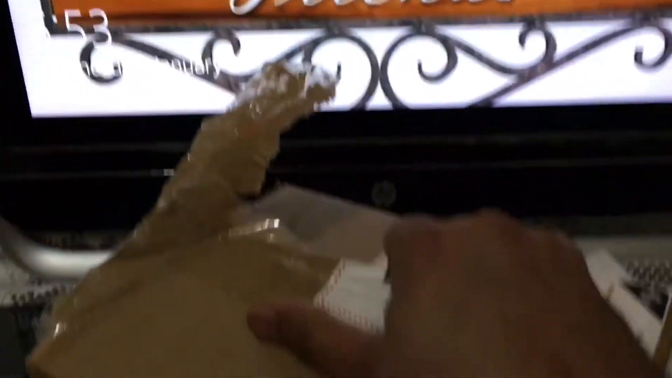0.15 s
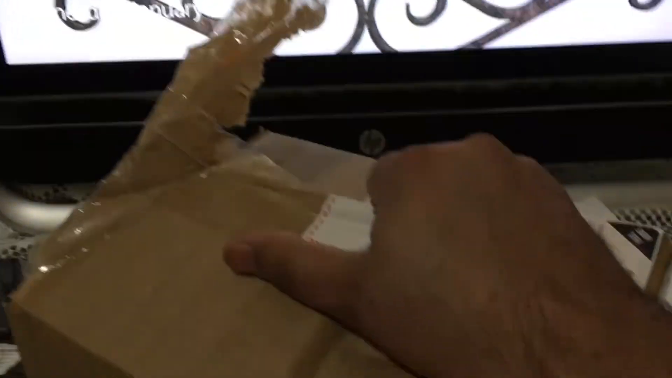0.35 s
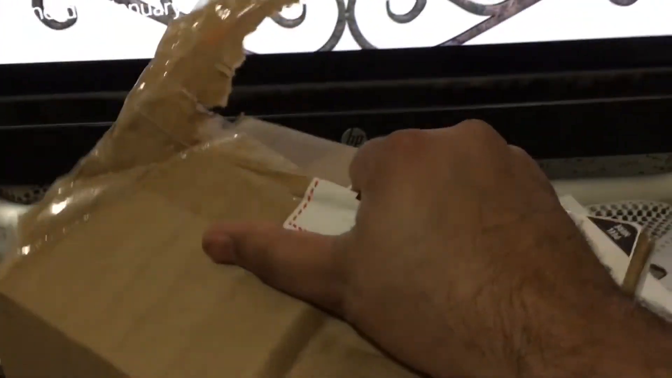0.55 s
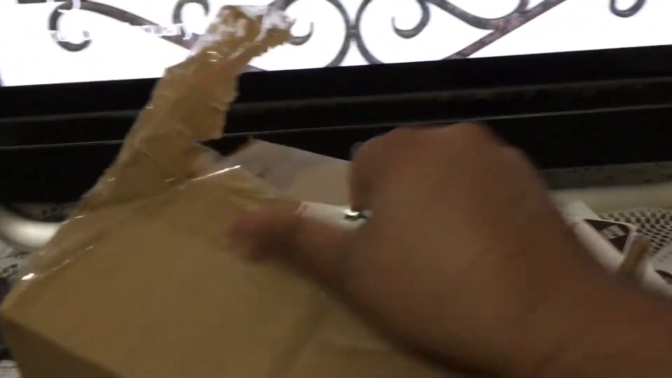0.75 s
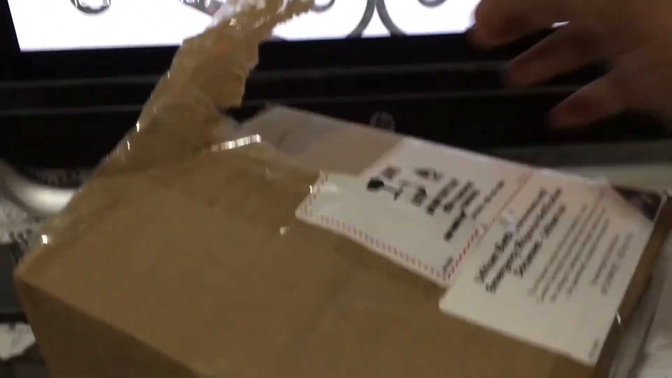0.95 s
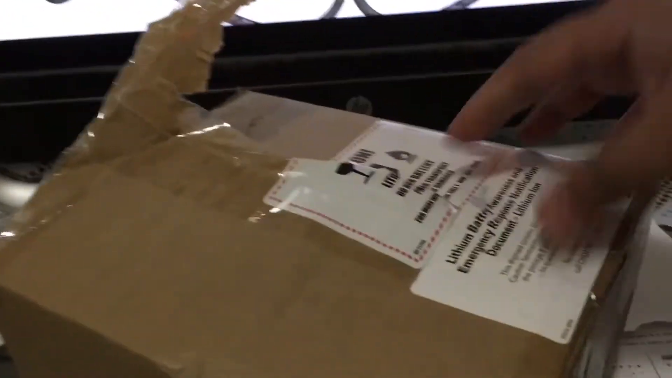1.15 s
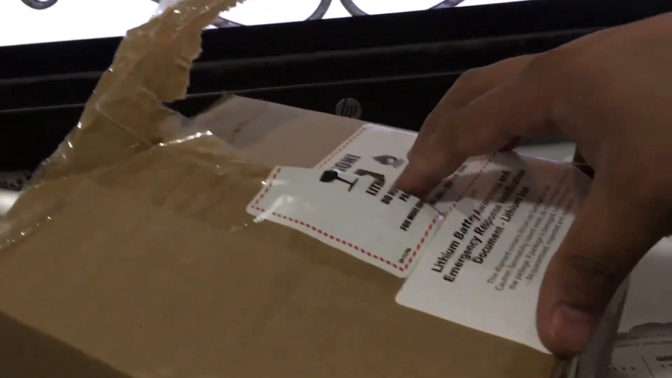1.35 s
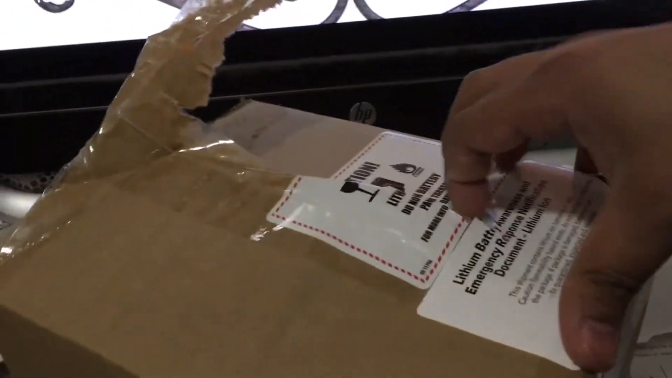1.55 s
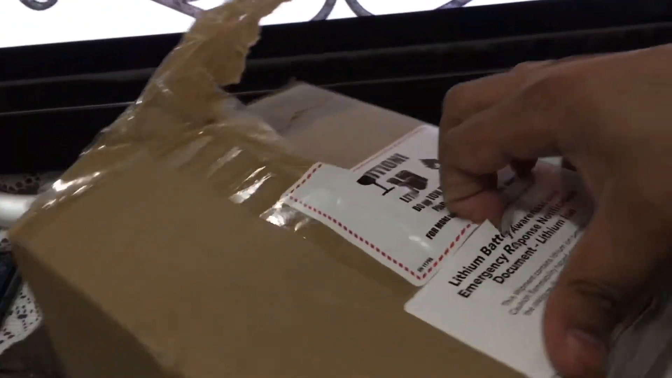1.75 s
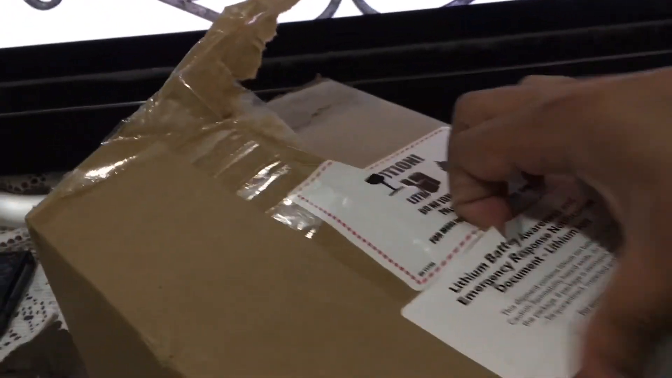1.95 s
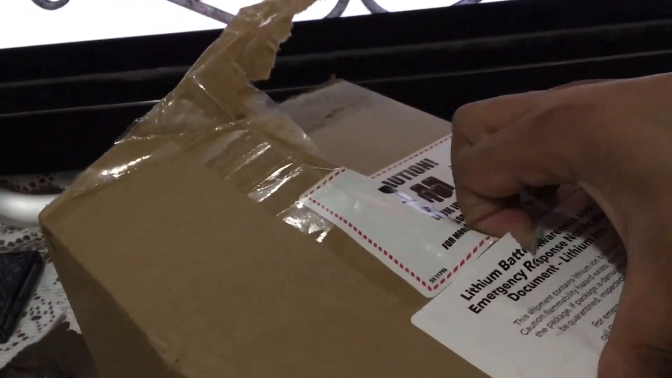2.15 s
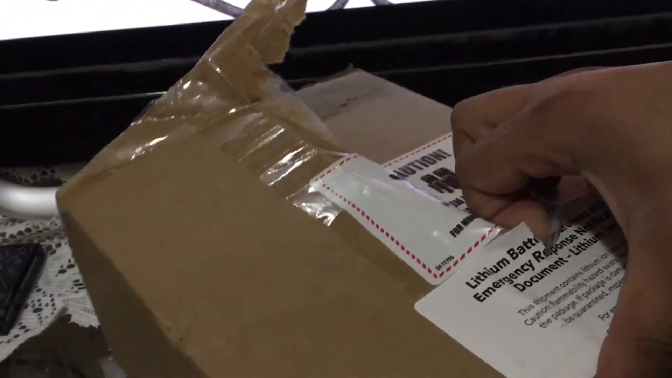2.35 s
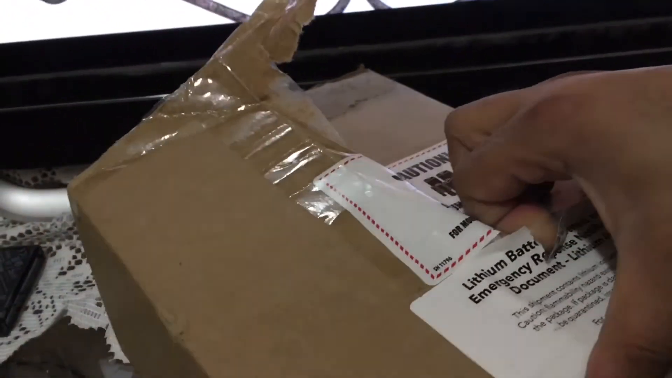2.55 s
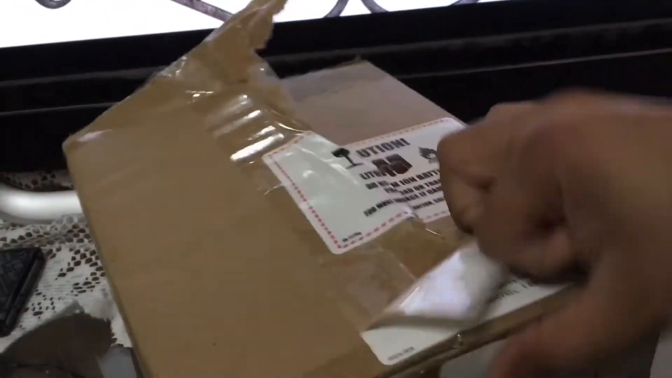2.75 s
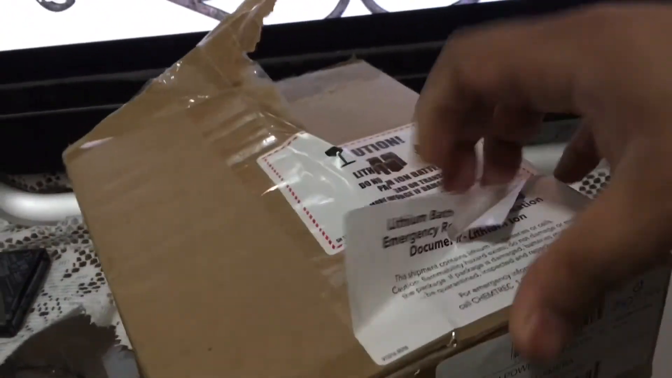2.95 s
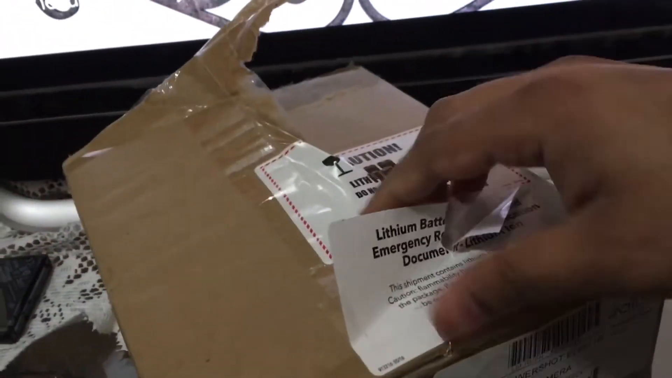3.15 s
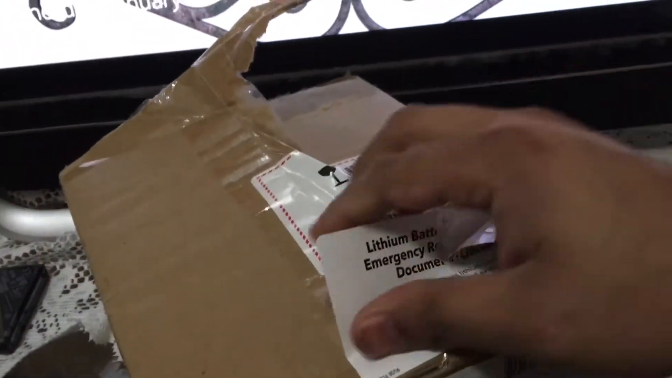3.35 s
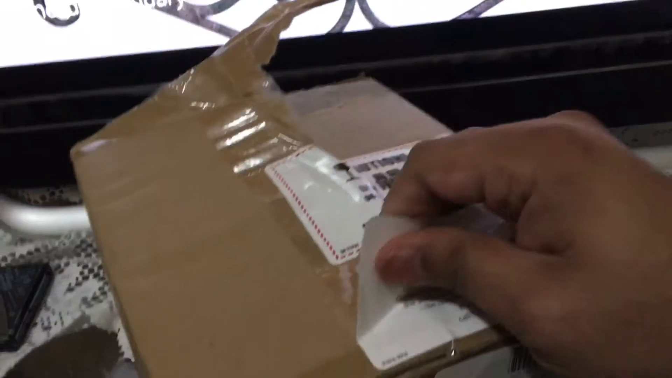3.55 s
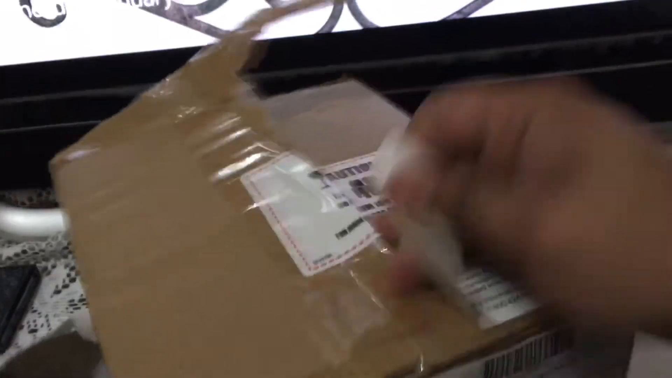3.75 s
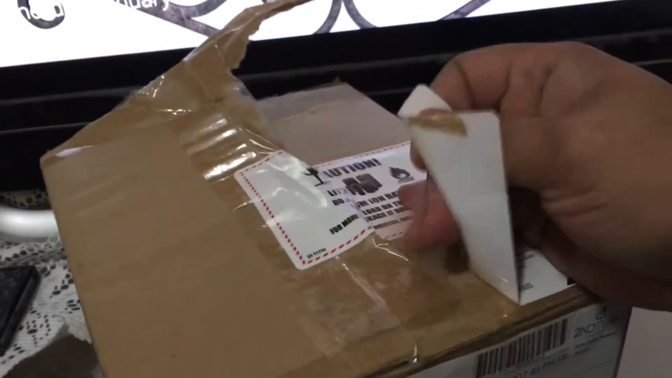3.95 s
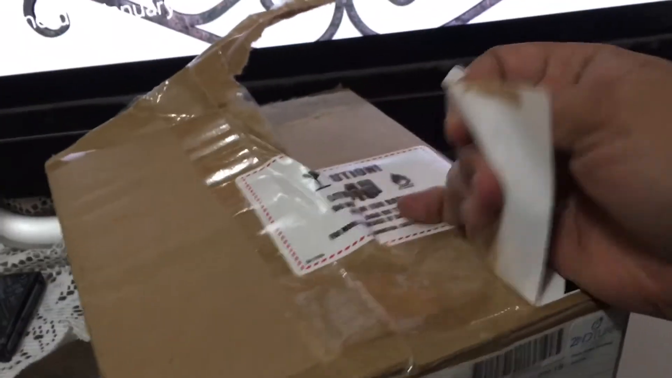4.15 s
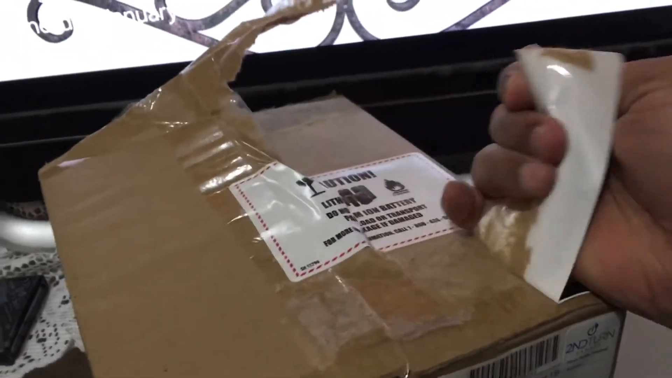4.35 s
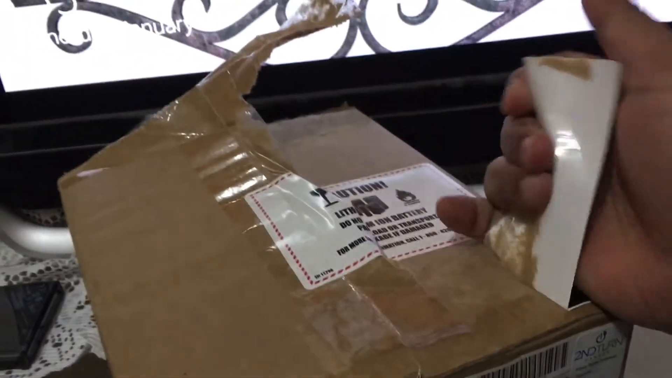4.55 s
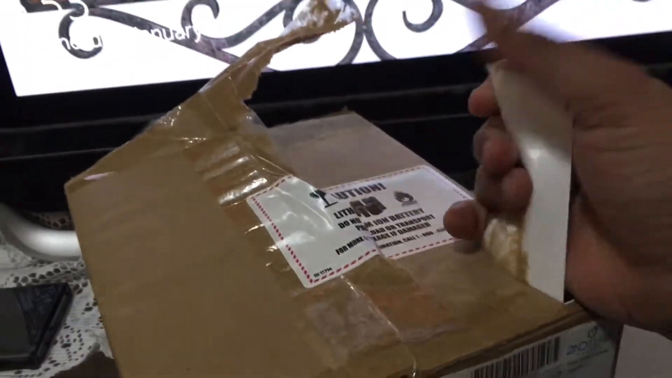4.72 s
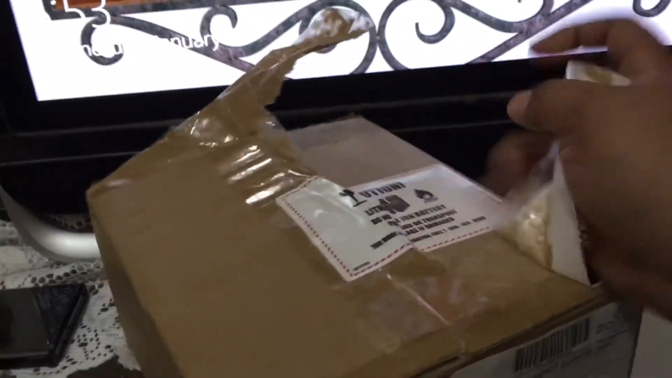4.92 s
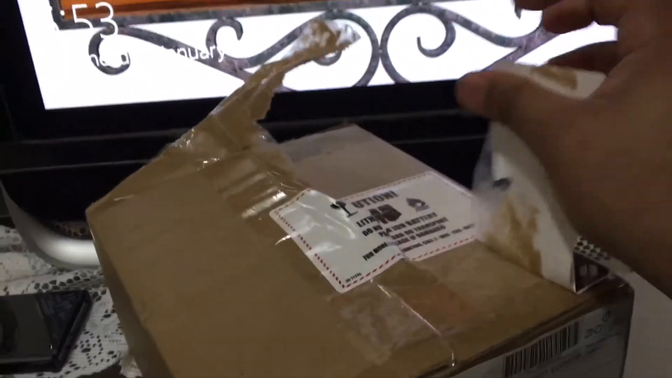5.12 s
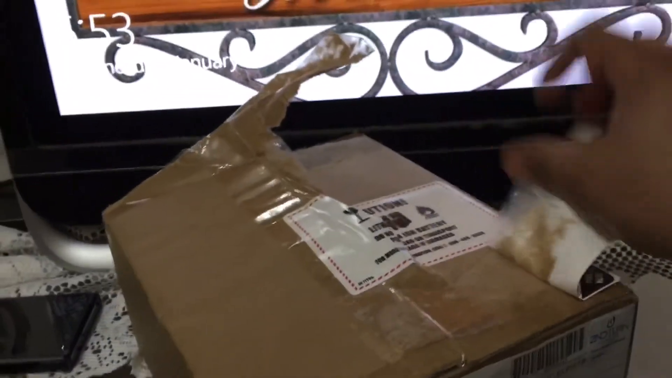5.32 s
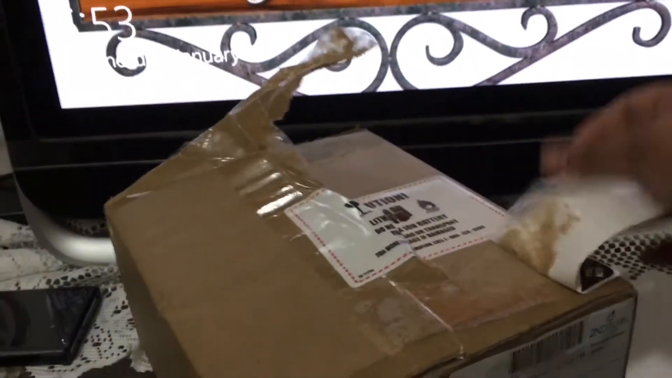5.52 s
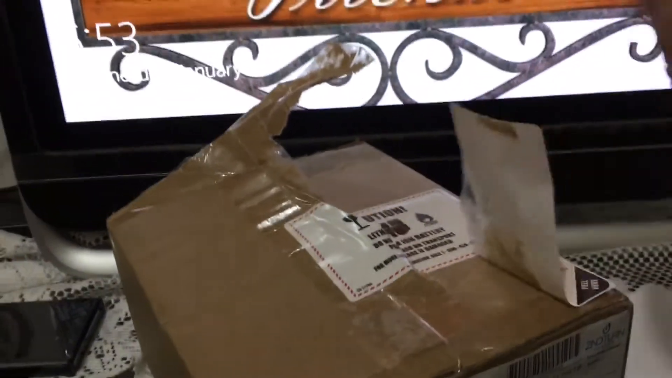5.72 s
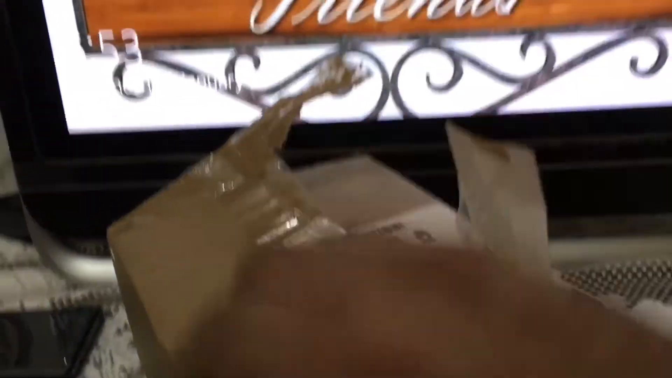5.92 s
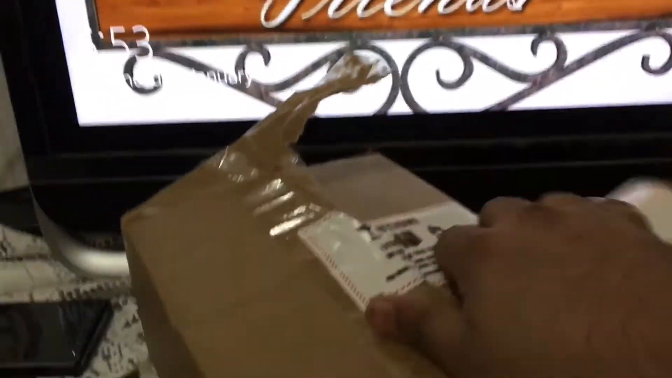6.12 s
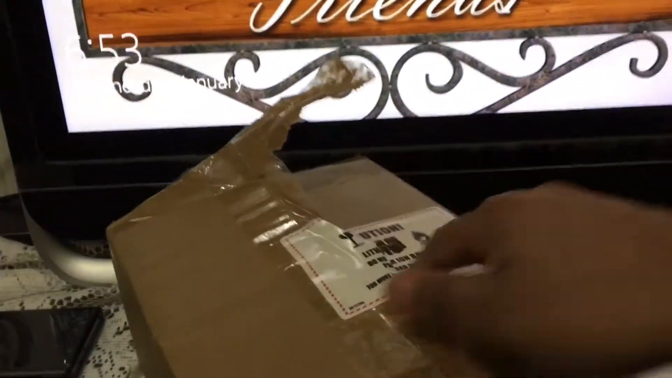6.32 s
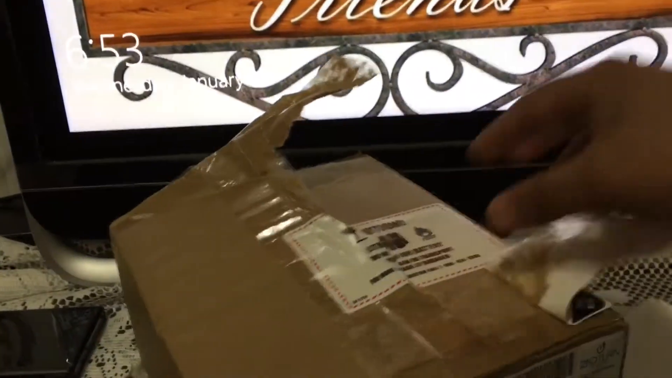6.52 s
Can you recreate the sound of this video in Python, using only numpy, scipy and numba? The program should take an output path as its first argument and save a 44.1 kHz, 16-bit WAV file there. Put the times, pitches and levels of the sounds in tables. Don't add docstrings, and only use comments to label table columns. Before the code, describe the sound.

Close fingers pick and rub at paper on a carton, then rip it loose in loud crackling bursts before settling into faint brushing in a quiet room.

```python
import sys
import numpy as np
from scipy import signal
from scipy.fft import rfft, irfft
from scipy.io import wavfile
from scipy.ndimage import uniform_filter1d
from numba import njit

SR = 44100
rng = np.random.default_rng(int(sys.argv[2]) if len(sys.argv) > 2 else 0)


def materialize(psi):
    bounded = np.clip(np.atleast_2d(psi).T, -1, 1)
    quanta = np.round(bounded * 32767).astype(np.int16)
    wavfile.write(sys.argv[1], SR, quanta)


def volts_from_db(level):
    exponent = np.asarray(level, float) / 20
    return 10 ** exponent


N = 294588


def level(x, db):
    return x * volts_from_db(db) / np.sqrt(np.mean(x ** 2))


def peak(x, db):
    return x * volts_from_db(db) / np.max(np.abs(x))


def band(x, lo_hz, hi_hz, order=2):
    sos = signal.butter(order, [lo_hz, min(hi_hz, 0.48 * SR)], "bandpass", fs=SR, output="sos")
    return signal.sosfilt(sos, x)


def modes(x, table):
    return sum(volts_from_db(db) * band(x, hz - width / 2, hz + width / 2, order=1) for hz, width, db in table)


def colour(points):
    hz, db = np.transpose(points)
    f = np.fft.rfftfreq(N, 1 / SR) + 1
    gain = volts_from_db(np.interp(np.log(f), np.log(hz), db))
    return irfft(rfft(rng.standard_normal(N)) * gain, N)


def walk(rate_hz):
    hold = int(SR / rate_hz)
    steps = np.repeat(rng.standard_normal(N // hold + 1), hold)
    return 1.14 * uniform_filter1d(uniform_filter1d(steps, hold), hold)[:N]


def crumbs(grains_per_s, spread_db, grain_s):
    strength = volts_from_db(spread_db * np.minimum(rng.exponential(size=N), 3))
    ticks = (rng.random(N) < grains_per_s / SR) * strength
    return level(signal.lfilter([1], [1, -np.exp(-1 / (grain_s * SR))], ticks), 0)


def gate(start_s, end_s, edge_s):
    t = np.arange(N) / SR
    return np.clip(np.minimum(t - start_s, end_s - t) / edge_s, 0, 1)


# (frequency [Hz], level [dB per Hz])
ROOM_AIR = [(26, -32.5), (45, 0.5), (197, -3), (321, -7.5), (391, 0), (640, -13.5), (880, -8),
            (1400, -15.5), (2500, -21), (3100, -31), (12500, -39), (16000, -39.5)]
ROOM_DB = -50.5
# (time [s], low line level [dB], upper line level [dB])
MOTOR = [(0, -61.5, -57), (4.0, -58.5, -64.5), (5.1, -69.5, -57), (5.5, -56, -56.5), (5.7, -57, -69),
         (6.68, -52, -75)]
# (low [Hz], upper [Hz])
MOTOR_HZ = (210.6, 384)


def room():
    s, *lines_db = np.transpose(MOTOR)
    t = np.arange(N) / SR
    out = level(colour(ROOM_AIR) * volts_from_db(0.9 * walk(5)), ROOM_DB - 2)
    for hz, db in zip(MOTOR_HZ, lines_db):
        gain = volts_from_db(np.interp(t, s, db) + 1 + 0.83 * walk(6.5))
        turns = np.cumsum(hz * (1 + 0.0055 * walk(4.6))) / SR
        out = out + gain * np.sin(2 * np.pi * turns)
    return out


# (frequency [Hz], width [Hz], level [dB])
BOX_PANELS = [(122.7, 20, 1.5), (250.6, 120, 9.5), (310, 47, 7.5), (420, 330, -2.5), (725, 150, 3.5),
              (860, 25, -5)]


def panels(x):
    return modes(x, BOX_PANELS)


def strokes(rows, fall_db_per_s):
    build_db, land_db_per_s = 4.5, 450
    t, power = np.arange(0, N, 64) / SR, 0
    for a, b, *db in rows:
        shape_db = -build_db * np.clip((b - t) / max(b - a, 1e-3), 0, 1)
        shape_db = shape_db - land_db_per_s * np.maximum(a - t, 0)
        shape_db = shape_db - fall_db_per_s * np.maximum(t - b, 0)
        power = power + volts_from_db(np.add.outer(db, shape_db)) ** 2
    return [np.interp(np.arange(N) / SR, t, np.sqrt(p)) for p in power]


# (start [s], end [s], hiss
# level [dB], scrape level [dB])
RUB_STROKES = [(0.0, .2, -49.5, -54), (0.21, .46, -49, -52), (.21, .24, -47, -42), (0.5, .61, -46, -53),
               (.65, .74, -54.5, -52), (0.75, .92, -50.5, -48), (.95, 1.5, -62, -61.5),
               (1.25, 1.33, -61.5, -67), (1.585, 1.63, -59, -51), (1.72, 1.87, -49.5, -54),
               (1.64, 1.72, -54, -59), (2.01, 2.06, -55.5, -58), (1.9, 2.1, -67.5, -64),
               (2.12, 2.4, -59, -52), (2.4, 2.62, -46.5, -55), (2.67, 2.75, -29.5, -37.5),
               (2.8, 3.0, -58.5, -58.5), (3.07, 3.15, -63, -64), (3.16, 3.25, -56.5, -53),
               (3.335, 3.37, -53.5, -53), (3.4, 3.5, -62, -62),
               (3.517, 3.78, -46, -47), (3.85, 3.884, -33.5, -27.5), (3.93, 4.023, -45.5, -61),
                (4.046, 4.193, -36, -38), (4.233, 4.297, -31, -27.5), (4.338, 4.408, -39.5, -43),
                (4.455, 4.594, -54, -51), (4.656, 4.785, -44, -55), (4.84, 4.95, -44.5, -44),
                (4.953, 4.981, -44, -36), (5.03, 5.108, -54, -52), (5.157, 5.428, -65.5, -60),
                (5.47, 5.485, -49.5, -49.5), (5.502, 5.614, -44, -48), (5.64, 5.665, -68, -52.5),
                (5.73, 5.79, -64, -58.5), (5.8, 6.09, -78, -65), (6.107, 6.186, -59.5, -52),
                (6.229, 6.686, -59, -60), (6.31, 6.425, -51, -48), (6.547, 6.61, -53, -56)]
# (start [s], end [s], box rumble level [dB])
PRESSES = [(0.0, .03, -36), (0.21, .25, -37.5), (0.45, .6, -49), (0.75, .88, -39.5), (1.57, 1.61, -40),
           (1.7, 1.83, -48.5), (2.12, 2.2, -47), (2.36, 2.46, -47), (2.69, 2.735, -24), (3.16, 3.23, -49),
           (3.33, 3.36, -56), (3.52, 3.6, -44.5), (3.81, 3.835, -27), (4.05, 4.2, -50.5),
           (4.225, 4.28, -33), (4.81, 4.83, -38), (4.93, 4.99, -35.5), (5.15, 5.18, -45), (5.46, 5.6, -56),
           (6.1, 6.13, -58.5), (6.27, 6.36, -54), (6.55, 6.62, -51)]
# (frequency [Hz], level [dB per Hz])
FRICTION_HISS = [(2060, -36.5), (3500, 0), (4240, -1.5), (4870, -10), (5360, 0), (8690, -3), (10500, 0),
                 (11500, -3), (16000, -8.5)]


def rub():
    crease_share = 0.3
    slide, drag = strokes(RUB_STROKES, fall_db_per_s=217)
    press, = strokes(PRESSES, fall_db_per_s=159)
    creases = crumbs(400.0, 3.0, 0.0006)
    grain = np.sqrt(1 - crease_share + crease_share * creases ** 2) * volts_from_db(2 * walk(45))
    hiss = level(colour(FRICTION_HISS), 0) * grain
    sheet = band(rng.standard_normal(N) * grain, 800, 3100)
    card = modes(rng.standard_normal(N) * grain, [(1250, 250, 0), (2000, 550, -1)])
    scrape = level(sheet + 2.2 * card, 0)
    rumble = level(panels(rng.standard_normal(N) * volts_from_db(2.2 * walk(25))), 0)
    return hiss * slide + scrape * drag + rumble * press


# (start [s], end [s],
# level [dB], frequency [Hz])
RASPS = [(.0, .145, -52, 1480), (1.715, 1.87, -52, 1380), (1.72, 1.77, -57, 2040), (1.585, 1.645, -50, 900),
         (4.52, 4.57, -48, 1800), (2.731, 2.78, -27, 1680), (2.735, 2.8, -30, 430), (2.79, 2.9, -42, 430),
         (2.78, 2.86, -40, 1700), (2.77, 2.88, -46, 3600), (3.17, 3.25, -58, 900), (3.345, 3.37, -57, 900)]


def rasps():
    rough = rng.standard_normal(N) * volts_from_db(2.5 * walk(60))
    out = np.zeros(N)
    for a, b, db, hz in RASPS:
        out += level(modes(rough, [(hz, 0.16 * hz, 0)]), db) * gate(a, b, 0.015)
    return out


def one_slip(db, mid_db, low_db, own_hz, stage, overtones):
    taut_hz, base_hz, ring_s, sheet_q, crack_s = stage
    hz2, db2, hz3, db3, lid_db = overtones
    t = np.arange(2048) / SR
    tear = rng.standard_normal((3, 2048))
    slack_hz = taut_hz * np.exp(0.006 * mid_db * np.clip(tear[2, 0], -2, 2))
    sheet_hz = slack_hz if own_hz is None else own_hz
    tint_hz = np.clip(base_hz + 202.5 * (db - mid_db), 3200, 11000)

    after = volts_from_db(-13 + 0.52 * mid_db) * np.exp(-t / 0.006)
    fibres = tear[0] * (np.exp(-(t / crack_s) ** 2) + after)
    push = tear[1] * (np.exp(-t / ring_s) + 0.55 * after)
    push[0] = 0.9 * np.sqrt(ring_s * SR / 2)
    fibres[0] = 0.7 * np.sqrt(crack_s * SR / 2)

    half = 0.5 / sheet_q
    ring = band(push, sheet_hz * (1 - half), sheet_hz * (1 + half)) + 0.36 * band(push, 1100, 3000)
    crack = 1.9 * (tint_hz / 8000) ** 3 * band(fibres, 4800, 22000)
    crack = crack + band(fibres, max(tint_hz / 1.7, 2800), min(tint_hz * 1.7, 16000))
    box_s = 0.002
    box = panels(tear[2] * t / box_s * np.exp(-t / box_s))
    second = peak(band(fibres, 0.9 * hz2, 1.1 * hz2), min(mid_db + db2, db + 4))
    third = peak(band(fibres, 0.9 * hz3, 1.1 * hz3), min(mid_db + db3, db + 4))
    lid = band(push, *LID_HZ, order=1) + 0.7 * band(push, 1150, 1400, order=1)
    lid = np.roll(peak(lid, low_db + lid_db), int(0.0012 * SR))
    return peak(crack, db + 1.5) + peak(ring, mid_db + 1.5) + peak(box, low_db - 1) + second + third + lid


# (time [s], crack peak level [dB], sheet ring level [dB], box level [dB])
PICKS = [(0.2085, -6, -5, -12), (0.2618, -36, -25, -33), (0.5583, -23, -45, -47), (0.5883, -27, -41, -42),
         (0.7976, -21, -26, -32), (0.8211, -34, -29, -40), (0.8532, -28, -36, -38), (0.875, -10, -25, -34),
         (0.886, -35, -26, -43), (1.6359, -31, -32, -39), (1.684, -29, -44, -41), (2.1248, -30, -38, -39),
         (2.2608, -15, -28, -38), (2.2929, -11, -17, -40), (2.3547, -16, -41, -48), (2.3647, -21, -46, -59),
         (2.4443, -11, -29, -37), (2.4594, -3, -25, -52), (2.4677, -10, -19, -47), (2.4929, -21, -45, -56),
         (2.5549, -26, -40, -48), (2.573, -28, -43, -48), (2.5907, -27, -42, -55), (2.6354, -9, -17, -32),
         (2.6713, -14, -24, -32)]
TICKS = [(1.094, -42, -59, -60), (1.1993, -45, -58, -60), (1.2571, -37, -55, -60), (1.294, -45, -53, -60),
         (1.4233, -44, -50, -60), (1.4552, -38, -55, -60), (1.4956, -47, -57, -60)]
CORNER = [
    (2.6878, -2, -9, -10),
    (2.703, -6, -20, -33),
    (2.7126, -4, -17, -19),
    (2.7327, -3, -6, -14),
    (2.7381, 0, -7, -14),
    (2.7445, -10, -9, -14),
    (2.7628, -22, -20, -21),
]
PULL = [(3.4982, -31, -39, -40), (3.5134, -30, -39, -41), (3.5378, -20, -29, -58), (3.5526, -26, -34, -45),
        (3.5681, -4, -23, -29), (3.6237, -23, -37, -44), (3.6521, -20, -37, -47), (3.6832, -21, -33, -42),
        (3.7859, -20, -37, -39), (3.813, 1, -8, -13), (3.8199, -2, -8, -14), (3.8273, -1, -9, -30),
        (3.8343, -4, -5, -21), (3.8383, -4, -9, -23), (3.8533, -2, -6, -15), (3.8663, -3, -5, -22),
        (3.8688, -6, -6, -24), (3.8786, -3, -4, -17), (3.8857, -3, -6, -32)]
JERKS = [(4.0341, -2, -10, -24), (4.089, -20, -33, -56), (4.0944, -21, -36, -46), (4.1453, -1, -9, -22),
         (4.1487, -13, -11, -15), (4.1966, -25, -30, -49), (4.2255, -2, -7, -13), (4.2381, -2, -7, -15),
         (4.2392, -3, -7, -14), (4.2451, -4, -7, -31), (4.2496, -12, -18, -27), (4.2717, -4, -7, -14),
         (4.2824, -3, -6, -19), (4.2963, -2, -6, -16), (4.3481, -2, -8, -17), (4.3662, -15, -12, -47),
         (4.395, -22, -26, -37), (4.4222, -16, -34, -53), (4.5155, -23, -38, -48)]
FOLDS = [
    (4.4891, -10, -19, -43),
    (4.5915, -40, -36, -60),
    (4.6054, -14, -28, -48),
    (4.651, -26, -27, -50),
    (4.6573, -39, -24, -37),
    (4.6706, -5, -10, -46),
    (5.7273, -19, -20, -60),
    (5.7507, -40, -29, -42),
]
LAST_STRIP = [(4.6973, -30, -33, -52), (4.7373, -26, -17, -47), (4.7448, -23, -26, -49),
              (4.7481, -16, -29, -47), (4.7622, -20, -29, -45), (4.7771, -17, -24, -55),
              (4.8117, -7, -8, -25), (4.818, -4, -11, -20), (4.8242, -5, -7, -15), (4.9478, -6, -21, -35),
              (4.9596, -18, -25, -53), (4.9796, -10, -11, -28), (4.9885, -9, -11, -22),
              (4.9941, -11, -26, -47)]
TOUCHES = [(3.0565, -29, -40, -50), (3.0647, -34, -48, -50), (5.1597, -28, -25, -34),
           (5.4603, -19, -30, -38), (5.5578, -26, -34, -52), (5.6608, -34, -37, -41),
           (6.1004, -22, -31, -32), (6.1044, -34, -25, -30), (6.1382, -41, -31, -36), (6.19, -38, -38, -33),
           (6.4212, -28, -34, -46), (6.6036, -26, -28, -28)]
# (sheet pitch [Hz], crack colour [Hz], ring [s], ring sharpness [Q], crack [s])
STAGES = [
    (1957, 5650, .0009, 1.6, .0007),
    (1700, 4800, .0017, 3.0, .0009),
    (1900, 5000, .0016, 3.2, .0009),
    (1750, 5200, .0021, 2.6, .0008),
    (2200, 2100, .0007, 1.4, .0005),
    (2250, 9300, .0014, 2.4, .0008),
    (1977, 9200, .001, 1.8, .0007),
]
# (second mode [Hz], level [dB], third mode [Hz], level [dB], lid level [dB])
OVERTONES = [(3600, -9, 6500, -14, 1), (3070, -9, 4050, -10, -3), (4400, -17, 6000, -15, 2),
             (3380, -6, 5850, -7, 3), (4300, -8, 5400, -9, -6), (4600, -15, 6800, -13, -1),
             (3400, -12, 5400, -13, -2)]
# (time [s], sheet pitch [Hz])
TENSION = [(.2085, 2500), (.2618, 1400), (.8211, 1570), (1.6359, 3200), (2.1248, 1210), (2.4443, 3400),
           (2.6354, 2770), (2.6713, 3040), (2.6878, 3070), (2.7126, 1400), (2.7327, 1630), (3.4982, 3010),
           (3.5378, 3120), (3.5681, 3500), (3.813, 2490), (3.8199, 2300), (3.8663, 2050), (4.0341, 1650),
           (4.1453, 1660), (4.1487, 2350), (4.2255, 1650), (4.2717, 1650), (4.2824, 1700), (4.3481, 2050),
           (4.3662, 1900), (4.4891, 3340), (4.5915, 3350), (4.6054, 3340), (4.6706, 3260), (4.9478, 3400),
           (4.9796, 2640), (5.4603, 3000), (5.7507, 1600), (6.1044, 2180), (6.1382, 1430), (6.4212, 2720),
           (6.6036, 1130)]
# (low edge [Hz], high edge [Hz])
LID_HZ = (690, 880)


def slips():
    out = np.zeros(N + 2048)
    own_pitch = dict(TENSION)
    groups = (PICKS + TICKS, CORNER, PULL, JERKS, FOLDS, LAST_STRIP, TOUCHES)
    for rows, stage, overtones in zip(groups, STAGES, OVERTONES):
        for s, db, mid_db, low_db in rows:
            i = int(s * SR)
            out[i:i + 2048] += one_slip(db, mid_db, low_db, own_pitch.get(s), stage, overtones)
    return out[:N]


@njit
def walls(x, lags, gain, damp):
    line, soft, out = np.zeros((8, 4096)), np.zeros(8), np.zeros(len(x))
    for i in range(len(x)):
        total = 0.
        for k in range(8):
            soft[k] += (1 - damp) * (gain[k] * line[k, (i - lags[k]) & 4095] - soft[k])
            total += soft[k]
        out[i] = soft[0] - soft[3] + soft[5] - soft[6]
        for k in range(8):
            line[k, i & 4095] = x[i] + soft[k] - total / 4
    return out


# (frequency [Hz], width [Hz], level [dB])
SHEET_MODES = [(1720, 480, -2.5), (3190, 300, -10), (3670, 300, -9)]


def sheet_ring(x):
    return modes(x, SHEET_MODES)


# (time [s], length [s], fibre level [dB], sheet level [dB])
RIPS = [(0.574, 0.031, -43.5, -65), (0.857, 0.04, -60, -38), (1.585, 0.032, -49, -43.5),
        (2.451, 0.013, -40, -59), (2.686, 0.011, -9, -30), (2.7365, 0.011, -11, -11),
        (3.04, 0.028, -56, -62), (3.811, 0.022, -13, -13), (3.831, 0.021, -26, -29.5),
        (4.807, 0.032, -33, -29), (4.959, 0.047, -29, -33.5), (5.45, 0.025, -37, -37.5),
        (5.542, 0.03, -37, -61), (5.581, 0.016, -33.5, -38)]


def rips():
    grain = np.sqrt(0.17 + crumbs(1400.0, 3.0, 0.00039) ** 2) * rng.standard_normal((2, N))
    fibres = level(band(grain[0], 3600, 16000), 0)
    sheet = level(sheet_ring(grain[1]) + modes(grain[1], [(2120, 610, 0.0027)]), 0)
    out = np.zeros(N)
    for s, length_s, fibre_db, sheet_db in RIPS:
        out += gate(s, s + length_s, 0.0045) * (volts_from_db(fibre_db) * fibres + volts_from_db(sheet_db) * sheet)
    return out


# (time [s], peak level [dB], pitch [Hz])
JOLTS = [(0.872, -60.5, 208), (1.582, -68, 121), (1.609, -38, 113), (2.694, -12.5, 62),
         (3.819, -20.5, 69.4), (4.144, -23, 196), (4.225, -35, 159), (4.271, -27.5, 163),
         (4.817, -24.5, 204.7), (5.63, -41, 106), (6.101, -34, 199), (6.172, -39, 145), (6.6, -42, 197)]
# (time [s], peak level [dB], pitch [Hz])
YANK = (2.6885, -15, 150)
# (time [s], peak level [dB], pitch [Hz])
TAPS = [
    (3.464, -38.5, 393),
    (3.725, -39.5, 720),
]


def jolts():
    out, t = np.zeros(N + 8192), np.arange(8192) / SR
    for s, db, hz in JOLTS + [YANK] + TAPS:
        decay = np.exp(-t * hz / (0.58 + hz / 400))
        swing = (1 - np.exp(-t / 0.0016)) * decay * np.sin(2 * np.pi * hz * t)
        i = int(s * SR)
        out[i:i + 8192] += peak(swing, db + 3.5)
    return out[:N]


# (start [s], end [s], level [dB], lowest resonance [Hz])
CREEP = [
    (2.143, 2.653, -49, 6800),
    (3.58, 3.82, -43, 5800),
    (4.046, 4.218, -39.5, 6200),
]
# (frequency [Hz], width [Hz], level [dB])
LABEL = [(8900, 900, -7.5), (12560, 2000, 2)]


def creep():
    threads = level(np.sqrt(0.35 + crumbs(170., 4.0, 0.0015) ** 2) * rng.standard_normal(N), 0)
    out = np.zeros(N)
    for a, b, db, hz in CREEP:
        out += level(modes(threads, [(hz, 800, 0)] + LABEL), db) * gate(a, b, 0.01)
    return out


# (start [s], end [s], pitch [Hz], level [dB])
SQUEAK = (5.34, 5.46, 1670.5, -63)


def squeak():
    a, b, hz, db = SQUEAK
    return volts_from_db(db + 3.5) * gate(a, b, 0.015) * np.sin(2 * np.pi * hz * np.arange(N) / SR)


def scene():
    hits = slips() + rips() + jolts()
    lags = np.array([331, 467, 613, 787, 953, 1129, 1327, 1559])
    t60_s, wall_db = 0.44, -25
    echo = walls(hits, lags, volts_from_db(-60 * lags / SR / t60_s), 0.33)
    echo = volts_from_db(wall_db) * (echo + 1.7 * sheet_ring(echo))
    return (hits + echo + rub() + creep() + squeak() + rasps() + room())[None]


@njit
def limit(x, top, release):
    y, e = np.empty(len(x)), 0.
    for i in range(len(x)):
        e = max(abs(x[i]), e * release)
        y[i] = x[i] * min(1., top / (e + 1e-9))
    return y


def top_cut(x):
    return signal.sosfilt(signal.butter(12, 16800, fs=SR, output="sos"), x)


def record(dry):
    x = np.clip(limit(dry[0], 0.74, np.exp(-1 / (0.00043 * SR))), -1, 1)
    x = signal.sosfilt(signal.butter(2, 30, "highpass", fs=SR, output="sos"), x)
    x = x - 0.5 * band(x, 10030, 10870, order=1)
    x = signal.sosfilt(signal.ellip(8, 0.2, 60, 15900, fs=SR, output="sos"), x)
    return top_cut(x[None])


dry = scene()
out = record(dry)
materialize(out)
```